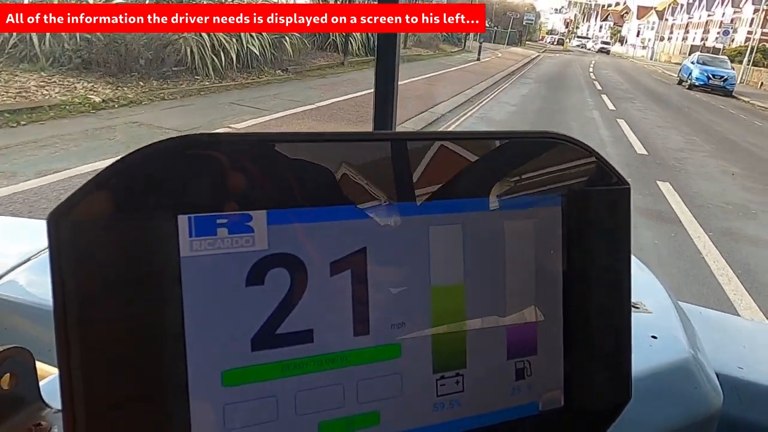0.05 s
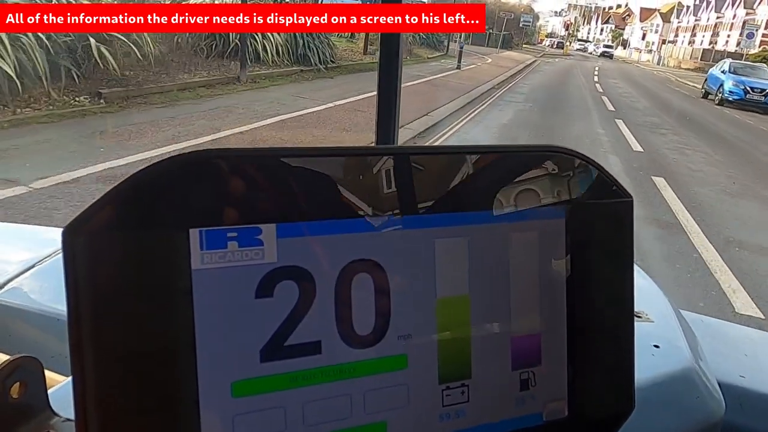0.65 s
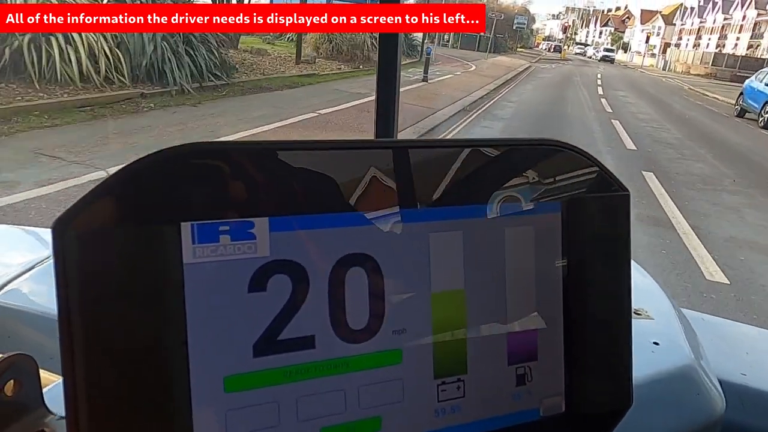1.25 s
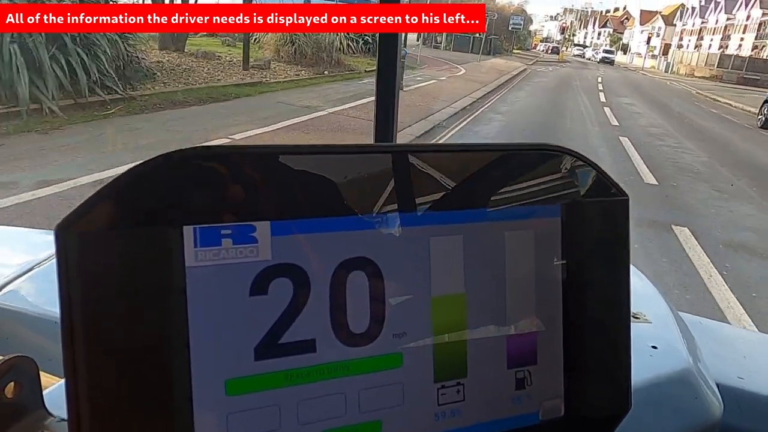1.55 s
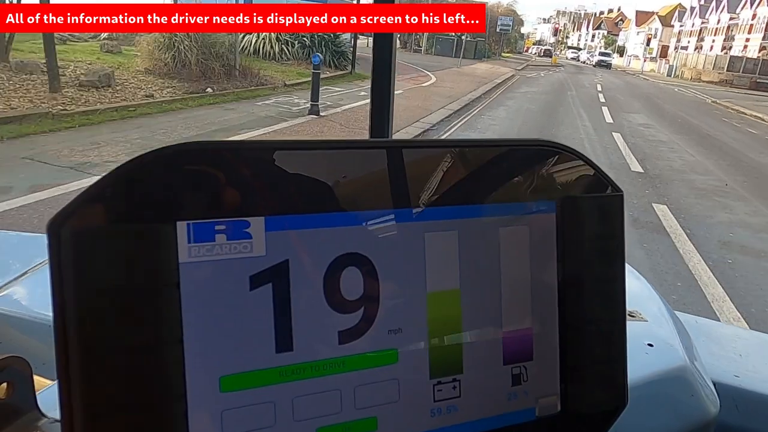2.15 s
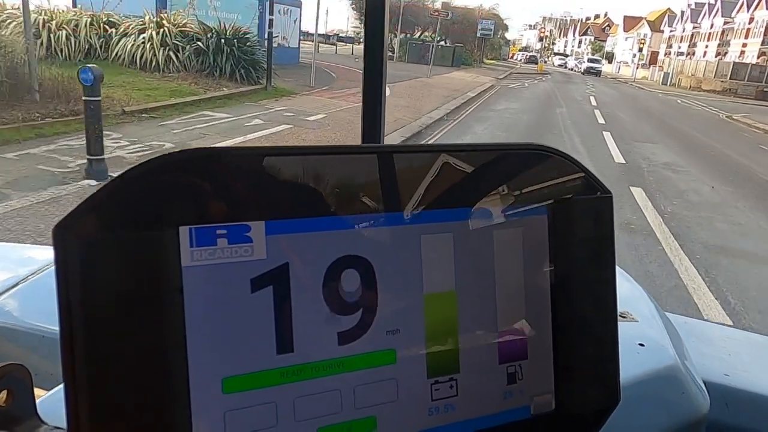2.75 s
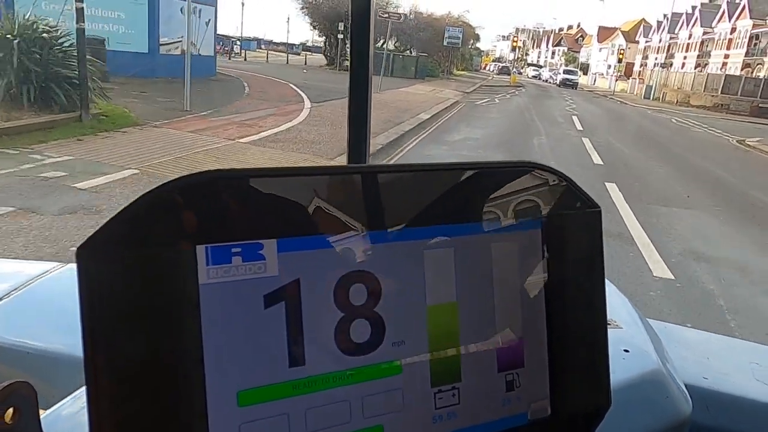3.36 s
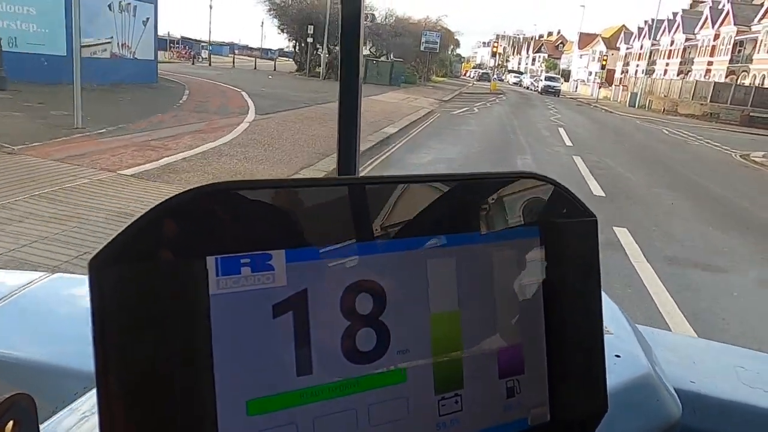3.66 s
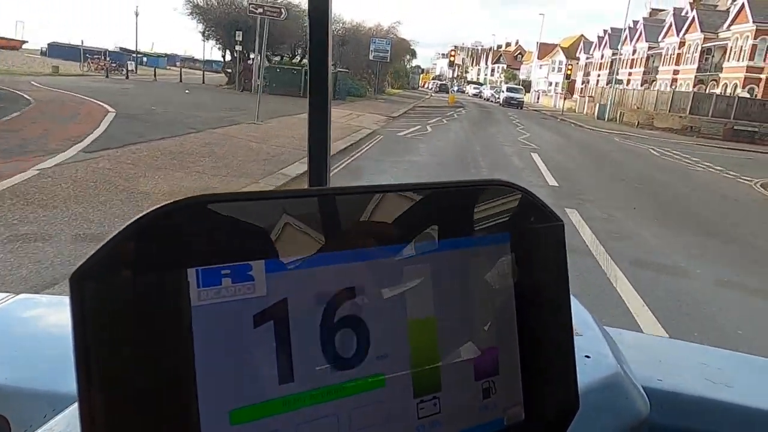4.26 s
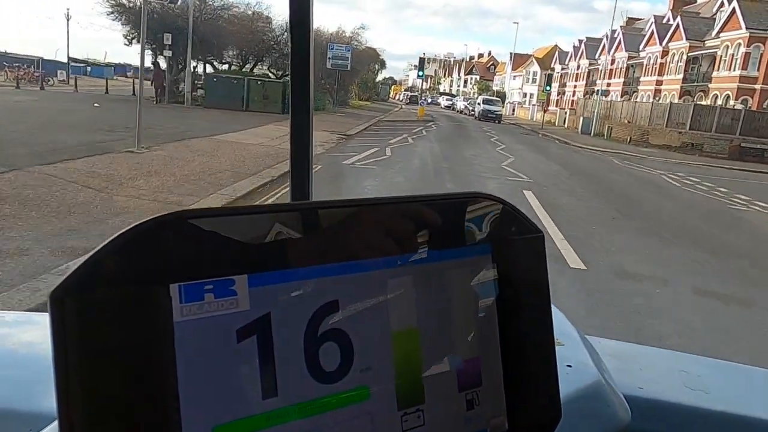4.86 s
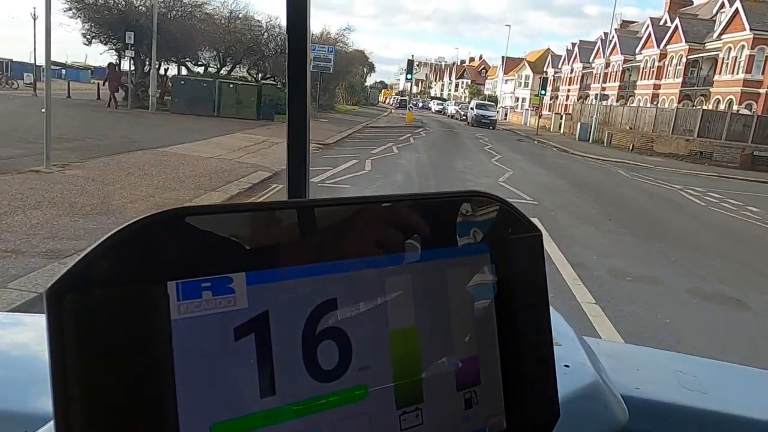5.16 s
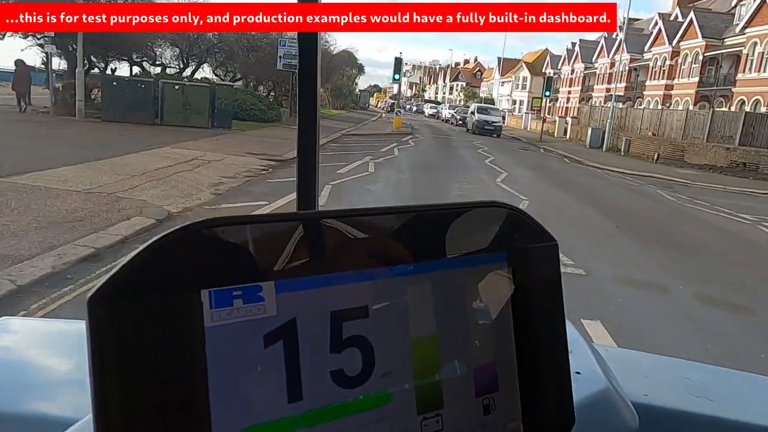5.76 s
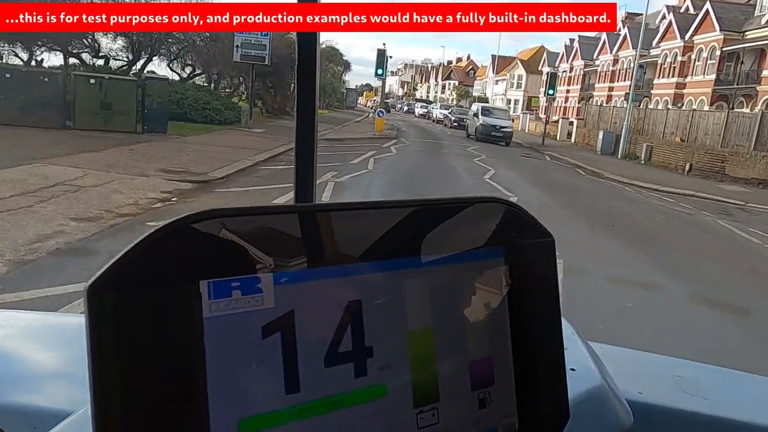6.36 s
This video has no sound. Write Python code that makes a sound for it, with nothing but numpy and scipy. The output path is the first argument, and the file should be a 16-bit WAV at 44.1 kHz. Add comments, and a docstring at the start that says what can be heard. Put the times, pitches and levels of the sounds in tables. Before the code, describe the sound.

Heard in stereo from the driver's seat, an electric bus rolls along a street with a deep, uneven cabin rumble. Bumps set off panel clacks, light rattles, metallic clinks and brief plastic scrapes, mainly on the left, plus one dull dashboard knock. Later the bus slows: a faint gear note sinks while a thin whine, a hum and a soft brake hiss build, ending on a heavier bump.

```python
"""Road rumble inside an electric bus slowing from 19 to 12 miles an hour on a town street,
heard on a stereo microphone at the driver's seat. Rough patches shake the body, floor and walls.
Mostly to the left, bumps make a loose panel clack, fittings rattle and the dashboard knock;
a metal clasp clinks, and plastic trim scrapes and ticks. As the bus slows, a thin drive whine
swells with a low hum and a faint brake hiss, while the gear note sinks."""
import sys
import numpy as np
from scipy import signal
from scipy.fft import rfft, irfft, next_fast_len
from scipy.io import wavfile
from scipy.ndimage import uniform_filter1d, minimum_filter1d, map_coordinates

SR = 44100
rng = np.random.default_rng(int(sys.argv[2]) if len(sys.argv) > 2 else 0)


def wrap_up_sound(samples):
    """Save the sound to the file named by the first command line argument, as 16-bit audio."""
    columns = np.atleast_2d(samples).T
    # keep every value between -1 and 1, then stretch to whole-number steps
    tamed = np.clip(columns, -1, 1)
    steps = np.round(tamed * 32767).astype(np.int16)
    wavfile.write(sys.argv[1], SR, steps)


N = 282681

# the bus slowing: (time [s], speed [mph])
ROAD_SPEED = [(0, 19.2), (2.2, 19.6), (4, 16.6), (4.9, 16.05), (5.65, 15.5), (6.41, 12.3)]
# contact crack of panel and dashboard: (frequency [Hz], level [dB])
CRACK_SPECTRUM = [(300, -21), (700, -4), (1000, -0.5), (1600, -8.5), (2500, 5.5), (3600, -2.5), (5600, -3),
                  (6600, -11.5), (7500, -24.5), (10000, -49.5), (15000, -71.5)]
# loose parts sit left of the microphone: (frequency [Hz], left minus right [dB])
PARTS_BALANCE = [(500, 1.5), (1400, 5), (2400, 5.5), (3800, 5.5), (6000, 0)]


def road():
    """Speed sets the rumble and tyre roar; rough patches swell them, shaking body, floor and walls."""
    # spectra at the seat, each (frequency [Hz], level [dB])
    body_sway = [(7.1, -23), (12, 9), (32, 9), (70, -10), (91, -45), (150, -120)]
    floor_boom = [(32, -39.5), (55, -1.5), (77, -2), (108, -20), (135, -20), (180, -28), (300, -120)]
    cabin_drone = [(71, -36), (120, -2.5), (142, -3.5), (205, -3), (250, -7.5), (285, -7.5), (312, -11),
                   (380, -10), (520, -17.5), (680, -45), (1140, -120)]
    tyre_roar = [(250, -33), (430, -14.5), (500, -7), (700, -5), (815, -9.5), (980, -7.5), (1400, -11.5),
                 (1800, -17), (2150, -15.5), (2800, -24.5), (4100, -26), (6200, -37), (9000, -51),
                 (15500, -76)]
    # rough and smooth road: (middle [s], half length [s], change in sway, boom, drone, tyres [dB])
    patches = [(0, 0.054, 11, -10.5, 1.5, 5.5), (.321, 0.14, 0, 8.5, 4, 2.5), (0.493, 0.077, 0, 5, 1, -1.5),
               (0.718, 0.063, -7.5, -10, 2.5, 1.5), (0.899, 0.082, 1, 5.5, 1, 3),
               (1.09, 0.066, 1.5, 2.5, 1.5, 1), (1.407, .13, -1, 5, 5, 0), (1.577, .1, -0.5, 7, 3.5, 0.5),
               (1.827, 0.14, 0, -4.5, 0.5, -.5), (2.077, 0.14, -5.5, 6, -1.5, -2),
               (2.362, 0.081, -0.5, -7, 1.5, 0), (2.545, 0.059, -1.5, -10, 1, -0.5),
               (2.768, 0.12, -1, 7.5, 2.5, 1), (2.916, 0.12, 0, 4, 3.5, 2), (3.133, .05, 0, -4, 2.5, 0),
               (3.484, 0.17, 2, 2, 1.5, 5), (4.129, 0.09, 3, -0.5, 3, 2.5),
               (4.708, 0.033, 0, -1.5, 3.5, -0.5), (4.857, .06, 2, 6, 4.5, 2),
               (4.977, 0.054, -7, -1.5, 1, 0), (5.6, 0.18, 4, 2, 1, 0.5), (5.884, .12, -6.5, -1.5, 0, -1.5),
               (6.197, 0.13, -3.5, 4, 2, 2), (6.4, 0.071, 3, 12.5, 10, 13)]
    speed, t = speed_db(), np.arange(N) / SR
    swells = sum(np.outer(db, np.exp(-((t - s) / half) ** 2)) for s, half, *db in patches)
    sway_db, boom_db, drone_db, tyre_db = swells

    def shaken(db, colour, uneven_db):
        return amp(db + uneven_db * wobble(14)) * steadied(cabin_noise(colour), span=0.087)

    sway = shaken(-13 + 0.68 * speed + sway_db, shape(body_sway), uneven_db=0.8)
    boom = shaken(-26.5 + 0.37 * speed + boom_db, shape(floor_boom), uneven_db=1)
    drone = shaken(-29 + 0.57 * speed + drone_db, ringing(cabin_drone), uneven_db=1.05)
    tyres = amp(-37.5 + 1.78 * speed + tyre_db + 0.89 * wobble(18)) * cabin_noise(ringing(tyre_roar))
    return sway + boom + drone + tyres


def panel():
    """A loose panel left of the microphone clacks at the bigger bumps."""
    # (time [s], relative level [dB], low knock [dB], brightness [dB], favoured pitch [Hz], slam delay [s])
    clacks = [(.2485, -14, -3, -4, 2550, .014), (.8365, -17, -2.5, -3.5, 2660, .011),
              (1.5105, -18, -9, -5, 2300, 0.0074), (1.920, -24, -13, -12.5, 3060, 0.0085),
              (2.0265, -14.5, -0.5, -3, 2660, .014), (2.6245, -14.5, -3, -2, 2550, .007),
              (2.7645, -13.5, 4.5, -5.5, 2376, .013), (3.2885, -17.5, -2, -3.5, 2230, 0.0083),
              (4.850, -22, -8, -1, 2700, 0.01), (5.623, -20.5, 2, 3, 2500, 0.0051),
              (5.7355, -22.5, -8, 0.5, 2380, 0.0056), (6.350, -12.5, -5.5, -3.5, 2920, 0.0071),
              (6.379, -28, 2.5, 1.5, 2150, 0.0046)]
    # panel resonances: (frequency [Hz], width [Hz], level [dB])
    modes = [(990, 67, -6.5), (1780, 67, -12.5), (2014, 62, -11), (2235, 52, -4), (2493, 56, -4),
             (2586, 38, -7.5), (2709, 29, 0), (2778, 38, -7), (3000, 18, -16), (3235, 17, -7),
             (3424, 67, -10.5), (3590, 44, -6.5), (3836, 49, -5.5), (3976, 40, -13), (4450, 55, -18.5),
             (4740, 32, -13), (5160, 70, -13), (5430, 60, -9.5), (5750, 70, -14.5), (6050, 88, -15),
             (6580, 79, -24.5)]
    return amp(-18) * loose_part(clacks, modes, CRACK_SPECTRUM, hold_s=0.0026, t60=0.18,
                                 crack_db=-4, wet_db=-7.5, spot_db=5)


def fittings():
    """Small fittings rattle at the lesser bumps."""
    # (time [s], relative level [dB], low knock [dB], brightness [dB], favoured pitch [Hz], slam delay [s])
    rattles = [(.660, -32.5, -10, -12, 2210, 0.0025), (1.380, -29.5, -2, -3.5, 4800, 0.0052),
               (1.405, -28.5, 0, 2.5, 2300, .004), (1.473, -33, -2, -3, 2300, 0.0057),
               (1.675, -29, 0.5, -2.5, 2200, .004), (2.855, -37.5, 1, 11, 4600, 0.0049),
               (2.915, -30.5, 2, -1, 2200, 0.0034), (2.928, -24.5, 1, 2.5, 3230, 0.0062),
               (3.004, -35.5, 1, -8, 4700, 0.0026), (3.096, -28.5, 1, -7, 2150, 0.0064),
               (3.114, -32.5, -3.5, 8, 3420, .004), (3.420, -31, 5.5, -11, 2200, 0.0045),
               (3.509, -27.5, -2, -0.5, 3340, 0.0032), (4.185, -28, -4.5, -4.5, 2200, 0.0026),
               (4.283, -33.5, -4, -4, 2256, .004), (4.308, -35, 0.5, -1.5, 3000, 0.0025),
               (4.394, -36, 5.5, 1, 2300, .004), (5.583, -25.5, -3, 0.5, 1980, 0.0072),
               (6.063, -28.5, -6, 2.5, 2950, 0.0088)]
    # their resonances: (frequency [Hz], width [Hz], level [dB])
    modes = [(1850, 270, -4.5), (2170, 180, -3), (2700, 100, -3), (2900, 21, 4), (3390, 22, -2),
             (3880, 37, -6.5), (4320, 120, -5), (4760, 80, -8), (5590, 80, -8.5), (5250, 70, -7.5),
             (6160, 38, -16.5)]
    # their contact crack: (frequency [Hz], level [dB])
    crack_spectrum = [(400, -20.5), (1000, 5), (2200, 2), (3200, -0.5), (5000, -4), (6200, -9.5),
                      (7000, -20), (10000, -42.5), (15000, -56.5)]
    return amp(-17.5) * loose_part(rattles, modes, crack_spectrum, hold_s=0.012, t60=0.15,
                                   crack_db=-2.5, wet_db=-6.5, spot_db=8)


def dashboard():
    """A bump shakes one dull knock out of the dashboard."""
    # (time [s], relative level [dB], low knock [dB], brightness [dB], favoured pitch [Hz], slam delay [s])
    knocks = [(4.089, -24, 5.5, -8, 1790, 0.002)]
    # dashboard resonances: (frequency [Hz], width [Hz], level [dB])
    modes = [(1070, 50, -2), (1380, 110, 3), (1660, 120, -0.5), (2170, 89, -1.5), (2430, 45, -11),
             (3270, 60, -19)]
    return amp(-18) * loose_part(knocks, modes, CRACK_SPECTRUM, hold_s=0.004, t60=0.15,
                                 crack_db=-6, wet_db=-15.5, spot_db=3.5)


def loose_part(events, modes, crack_spectrum, hold_s, t60, crack_db, wet_db, spot_db):
    """A part touches its seat, slams home, bounces and buzzes, ringing its modes and the cabin."""
    lead_s, touch_db, rise_s = 0.012, -2.5, 0.0008
    bounce_s, hard_db, hard_s = 0.0099, 4.5, 0.00077
    spot_octaves, detune = 0.17, 0.005
    out, t = np.zeros((2, N + SR)), np.arange(SR // 4) / SR - lead_s
    for s, db, knock_db, bright_db, spot_hz, slam in events:
        closing_db = touch_db * np.clip(1 - t / slam, 0, 1) - 60 * np.maximum(t - slam - hold_s, 0) / t60
        bounces = slam + np.cumsum(bounce_s * (0.5 + rng.random(6)))
        hard_hits = sum((t >= at) * np.exp(-np.abs(t - at) / hard_s) for at in [slam, *bounces])
        pressure = (1 + np.tanh(t / rise_s)) / 2 * amp(closing_db) * (1 + amp(hard_db) * hard_hits)
        contacts = pressure * rng.standard_normal(len(t)) * amp(1.4 * rng.standard_normal(len(t)))
        # each blow lands on a new spot, favours other modes and shifts them a little
        favour = lambda hz: spot_db * np.exp(-(np.log2(hz / spot_hz) / spot_octaves) ** 2)
        struck = [(hz * (1 + detune * rng.standard_normal()), width,
                   level + favour(hz) + 2 * rng.standard_normal()) for hz, width, level in modes]
        crack = unit(filtered(pressure * rng.standard_normal(len(t)), shape(crack_spectrum)))
        colour = shape([(1200, knock_db), (2200, 0), (3000, 0), (5000, bright_db)])
        hit = filtered(rung(contacts, struck) + amp(crack_db) * crack, colour)
        start = round((s - lead_s) * SR)
        out[:, start:start + len(t)] += amp(db) * unit(in_cabin(hit, wet_db))
    return leaning(out[:, :N], PARTS_BALANCE)


def rung(contacts, modes):
    """Contacts ring each (Hz, width, dB) mode; its level sets its share of the energy."""
    spectrum, hz = rfft(contacts), np.fft.rfftfreq(len(contacts), 1 / SR)
    centre, width, db = np.transpose(modes)[:, :, None]
    bands = spectrum * 1j * hz * width / (centre ** 2 - hz ** 2 + 1j * hz * width)
    gain = amp(db) * np.sqrt(np.abs(width)) / np.linalg.norm(bands, axis=1, keepdims=True)
    signs = (-1) ** np.arange(len(modes))[:, None]
    return unit(irfft(np.sum(signs * gain * bands, axis=0) * softened(hz), len(contacts)))


def clasp():
    """The tongue and catch of a metal clasp meet softly and ping over a brief, bright chafe."""
    # (time [s], tongue [dB], catch [dB], chafe [dB], sharpening as it seats [%])
    clinks = [(0.051, -49.5, -49, -38.5, 2.5), (1.024, -58, -61, -43, 0.64),
              (1.037, -34.5, -53, -35.5, -0.052), (1.1067, -42, -33, -42, -0.3),
              (3.467, -44, -32.5, -40, 2), (4.721, -62.5, -45, -48, 0.5), (4.811, -44, -38, -34, -1.5)]
    # modes of the two pieces, each (frequency [Hz], level [dB], t60 [s])
    tongue_modes = [(2150, 0, .34), (2627, -8, .2), (3490, -12, .25), (3940, -13, .22), (4370, -2, .2),
                    (5017, -12, .15), (5534, -4, .16), (7690, -26, .12), (8650, -28, .1), (11500, -43, .08)]
    catch_modes = [(2411, 0, .11), (3560, -5, .17), (4730, -6, .12), (5580, -18, .16), (5996, -20, .12),
                   (8000, -31, .12), (13000, -50, .06)]
    # metal chafing: (frequency [Hz], level [dB])
    chafe_spectrum = [(700, -19), (2500, 3.5), (5500, -4), (6800, -14.5), (8700, -22), (10500, -36),
                      (14000, -40.5), (15500, -55)]
    rise_s, chafe_t60 = 0.0044, 0.2
    out, t = np.zeros((2, N + SR)), np.arange(SR // 4) / SR
    rise = np.sin(np.pi / 2 * np.minimum(t / rise_s, 1)) ** 2
    for s, tongue_db, catch_db, chafe_db, sharp in clinks:
        pitch = 1 + sharp / 100
        noise = unit(filtered(rng.standard_normal(len(t)), shape(chafe_spectrum)))
        chafe = amp(chafe_db - 60 * t / chafe_t60) * noise
        tongue = amp(tongue_db) * ping(tongue_modes, pitch, t)
        catch = amp(catch_db) * ping(catch_modes, pitch, t)
        start = round(s * SR)
        out[:, start:start + len(t)] += in_cabin(rise * (tongue + catch + chafe), wet_db=-4)
    return leaning(out[:, :N], PARTS_BALANCE)


def ping(modes, pitch, t, blur_hz=30, chatter_db=4, chatter_s=0.006):
    """Struck metal; chafing blurs each mode and makes it chatter."""
    out, span = np.zeros(len(t)), int(chatter_s * SR)
    for hz, db, t60 in modes:
        chatter = unit(uniform_filter1d(uniform_filter1d(rng.standard_normal(len(t)), span), span))
        walk = uniform_filter1d(np.cumsum(rng.standard_normal(len(t))), size=64)
        phase = 2 * np.pi * hz * pitch * t + walk * np.sqrt(2 * np.pi * blur_hz / SR)
        out += amp(db - 60 * t / t60 + chatter_db * chatter) * np.sin(phase)
    return out


def trim_scrape():
    """Plastic trim groans and slides in tiny gritty slips as the body twists."""
    # slides: (time [s], level [dB], hold [s])
    slides = [(1.7, -44, .06), (3.512, -31, .012), (3.585, -34, .02), (3.655, -42.5, .012),
              (5.565, -45, .029)]
    # trim resonances: (frequency [Hz], width [Hz], level [dB])
    modes = [(1700, 273, 3.5), (2020, 430, -1), (2400, 200, -4.5), (4570, 540, -16.5), (6500, 1500, -34)]
    # hiss of the slips: (frequency [Hz], level [dB])
    grit_spectrum = [(3000, -20), (4700, 6.5), (6000, -5), (8000, -19.5), (10000, -27), (13000, -35.5),
                     (15500, -57)]
    attack_s, t60 = 0.031, 0.33
    strokes, t = np.zeros(N), np.arange(N) / SR
    for s, db, hold in slides:
        grip = np.clip((t - s) / attack_s, 0, 1)
        strokes += grip * amp(db - 60 * np.maximum(t - s - attack_s - hold, 0) / t60)
    pressing = amp(1.5 * wobble(30))
    slips = amp(1.1 * wobble(150))
    rub = cabin_noise(lambda hz: resonances(modes, hz) * softened(hz))
    grit = amp(-19) * unit(amp(3 * wobble(400)) * cabin_noise(shape(grit_spectrum)))
    groan = amp(-10) * tone(hz=702, waver_hz=2.9, flutter_db=0.5)
    return strokes * pressing * (unit(slips * rub) + grit + groan)


def trim_ticks():
    """The trim settles with small bright ticks, left of the microphone."""
    # (time [s], level [dB], t60 [s])
    ticks = [(.605, -52, 0.066), (0.727, -54, .12), (.838, -45.5, .09), (2.875, -50.5, .06),
             (3.007, -48, .07), (3.764, -37.5, 0.017), (4.036, -51, 0.14), (5.59, -47, .11),
             (6.365, -44.5, .12)]
    # colour of a tick: (frequency [Hz], level [dB])
    spectrum = [(1500, -14), (3000, -2), (5700, 0.5), (6600, -9), (7700, -5), (10000, -27.5),
                (15000, -44.5)]
    t, rise_s = np.arange(N) / SR, 0.0008
    snaps = sum(np.clip((t - s) / rise_s, 0, 1) * amp(db - 60 * np.abs(t - s) / t60)
                for s, db, t60 in ticks)
    return panned(snaps * cabin_noise(shape(spectrum)), left_db=6.5)


def drive_and_brakes():
    """Slowing loads the drive: it whines and hums and the brakes hiss, all growing with the effort."""
    # (time [s], braking effort [dB])
    braking = [(0, -55.5), (3.9, -36.5), (4.5, -16.5), (5.0, -17), (5.4, -9.5), (5.9, -7), (6.1, -2.5),
               (6.41, 1.5)]
    # the whine's fundamental: (time [s], pitch [Hz])
    whine_pitch = [(4.9, 1272), (5.65, 1265), (6.33, 1272)]
    # its harmonics: (multiple, level [dB])
    harmonics = [(1, -4), (2, -22), (3, -24.5)]
    # weaker tones around them: (frequency [Hz], level [dB])
    side_tones = [(1626, -14.5), (1723, -15), (2094, -14.5), (2315, -20.5), (2525, -21.5), (2907, -21.5),
                  (3801, -23.5), (3973, -26.5), (4958, -22.5), (5997, -24)]
    # brake hiss: (frequency [Hz], level [dB])
    hiss_spectrum = [(700, -15), (1300, 2), (2200, -2.5), (2800, -4.5), (3300, -11), (3900, -10.5),
                     (4300, -6), (4700, -10), (5400, -10), (5800, -19), (6100, -6), (6350, -12),
                     (6600, -19.5), (8000, -36.5), (12000, -68)]
    hum_hz, sag_hz = 429.5, 6  # effort pulls the hum's pitch down
    effort_db, pitch = curve(braking), curve(whine_pitch)
    whine = sum(amp(db) * tone(k * pitch, waver_hz=1.2, flutter_db=1.5) for k, db in harmonics)
    sides = sum(amp(db) * tone(hz, waver_hz=6.5, flutter_db=2.5) for hz, db in side_tones)
    hum = tone(hum_hz + sag_hz * (1 - amp(effort_db)), waver_hz=5, flutter_db=1.5)
    motor = amp(-37.5 + 0.89 * effort_db) * (whine + sides) + amp(-36 + 1.4 * effort_db) * hum
    hiss = amp(-41 + 0.68 * effort_db) * cabin_noise(shape(hiss_spectrum))
    return panned(motor, left_db=6) + hiss


def gears():
    """The gear mesh sinks with road speed and sings out as it passes each resonance of its casing."""
    # (frequency [Hz], width [Hz], level [dB])
    casing_modes = [(366, 46, -43), (338, 10, -38.5)]
    hz_per_mph = 21.72
    pitch = hz_per_mph * curve(ROAD_SPEED)
    gain = sum(amp(db) / (1 + (2 * (pitch - hz) / width) ** 2) for hz, width, db in casing_modes)
    return gain * tone(pitch, waver_hz=3.9, flutter_db=0)


def tread():
    """The rolling tyres ring faintly on one wavering note that fades as the bus slows."""
    note = tone(hz=979, waver_hz=7, flutter_db=2.5)
    return panned(amp(-51.5 + 3.7 * speed_db()) * note, left_db=3)


def cabin_noise(colour):
    """Stereo noise of rms 1: one pressure in the bass, diffuse and stronger on the left above it."""
    # (frequency [Hz], left-right likeness [0 to 1])
    likeness = [(40, 1), (150, 1), (300, 0.99), (600, 0.92), (1200, 0.85), (3000, 0.78), (6000, 0.41),
                (12000, 0.48)]
    # (frequency [Hz], left minus right [dB])
    balance = [(40, -0.1), (100, -0.4), (200, 0.2), (400, 0.5), (700, 3.5), (1400, 2.5), (3000, 3),
               (5000, 1)]

    def spread(hz):
        angle = np.arccos(np.clip(along(likeness, hz), -1, 0.9995)) / 2
        return colour(hz) * np.array([np.cos(angle), np.sin(angle)])

    mid, side = filtered(rng.standard_normal((2, N)), spread)
    return unit(leaning(np.array([mid + side, mid - side]), balance))


def ringing(points):
    """A (Hz, dB) spectrum coloured by narrow resonances of the cabin air and windows."""
    # (frequency [Hz], width [Hz], boost [dB])
    modes = [(150.4, 18, 4), (222.7, 18, 2), (285.8, 6.3, 5.5), (338, 2.4, 3), (403, 13, 1.5),
             (486, 5.2, 3.5), (557, 16, 3), (700, 8.3, -3.5), (768, 3.9, 0.5), (970, 10, 1.5),
             (1167, 5.3, 4), (1386, 22, 5)]
    boost_db = lambda hz: sum(db / (1 + (2 * (hz - c) / w) ** 2) for c, w, db in modes)
    return lambda hz: amp(along(points, hz) + boost_db(hz))


def in_cabin(hit, wet_db):
    """A short sound with its own diffuse cabin echo in each channel."""
    # (frequency [Hz], t60 [s])
    decay = [(300, 0.33), (2500, 0.32), (6000, 0.28), (12000, 0.32)]
    size = len(hit)
    hz, t, noise = signal.stft(rng.standard_normal((2, size)), SR, nperseg=256)
    tail = signal.istft(noise * amp(-60 * t / along(decay, hz)[:, None]), SR, nperseg=256)[1][:, :size]
    tail /= np.linalg.norm(tail[0])
    return hit + amp(wet_db) * signal.fftconvolve(hit[None], tail, axes=1)[:, :size]


def speed_db(cruise_mph=18):
    """Road speed in dB against cruising speed."""
    return 20 * np.log10(curve(ROAD_SPEED) / cruise_mph)


def softened(hz, corner_hz=7000):
    """The treble falls away steeply above the corner frequency."""
    return 1 / np.sqrt(1 + (hz / corner_hz) ** 6)


def resonances(modes, hz):
    """Causal response of (Hz, width, dB) modes."""
    return sum((-1) ** k * amp(db) * 1j * hz * w / (c * c - hz * hz + 1j * hz * w)
               for k, (c, w, db) in enumerate(modes))


def tone(hz, waver_hz, flutter_db):
    """A slightly unsteady sine of rms 1."""
    phase = 2 * np.pi * np.cumsum(hz + waver_hz * wobble(25)) / SR
    return unit(np.sin(phase) * amp(flutter_db * wobble(12)))


def steadied(x, span):
    """Noise with its chance swells slower than span seconds evened out."""
    power = uniform_filter1d(np.mean(x ** 2, axis=0), int(span * SR))
    return unit(x / np.sqrt(np.abs(power) + 0.054))


def wobble(rate):
    """A smooth random curve, rate knots a second."""
    return map_coordinates(rng.standard_normal(int(N * rate / SR) + 4), [np.arange(N) * rate / SR])


def panned(x, left_db):
    """Louder on the left by left_db."""
    return x * amp(np.array([[left_db], [-left_db]]) / 2)


def leaning(x, points):
    """Louder on the left by a (Hz, dB) spectrum."""
    return filtered(x, lambda hz: amp(np.outer([0.5, -0.5], along(points, hz))))


def filtered(x, response):
    """x through a complex frequency response."""
    size = x.shape[-1]
    padded = next_fast_len(size + 8192)
    return irfft(rfft(x, padded) * response(np.fft.rfftfreq(padded, 1 / SR)), padded)[..., :size]


def shape(points):
    """The gain of a (Hz, dB) spectrum as a function of frequency."""
    return lambda hz: amp(along(points, hz))


def along(points, hz):
    """(Hz, value) points joined on a log axis."""
    knots, values = np.transpose(points)
    return np.interp(np.log(hz + 1), np.log(knots + 1), values)


def curve(points):
    """(time, value) points joined into one value per sample."""
    return np.interp(np.arange(N) / SR, *np.transpose(points))


def amp(db):
    """Decibels to gain."""
    return 10 ** (np.asarray(db) / 20)


def unit(x):
    """Scaled to rms 1."""
    return x / np.sqrt(np.mean(x ** 2) + 1e-20)


def scene():
    """Everything heard from the driver's seat."""
    rolling = road() + tread() + gears()
    rattling = panel() + fittings() + dashboard() + clasp()
    return rolling + rattling + trim_scrape() + trim_ticks() + drive_and_brakes()


def record(dry):
    """The microphone's two ports differ in phase; a limiter eases peaks and the top treble is cut."""
    # (frequency [Hz], lead of the left port [rad])
    port_phase = [(30, 0.16), (70, 0.019), (180, 0.14), (450, -0.092), (1000, -.2), (2500, -0.77),
                  (4700, -0.69), (6500, -1.6)]
    ceiling, limiter_s, top_hz = 0.88, 0.03, 15700
    ports = filtered(dry, lambda hz: np.exp(1j * np.outer([0.5, -0.5], along(port_phase, hz))))
    needed_gain = ceiling / np.maximum(np.abs(ports).max(axis=0), ceiling)
    span = int(limiter_s * SR)
    gain = uniform_filter1d(minimum_filter1d(needed_gain, span), span)
    return filtered(ports * gain, lambda hz: hz < top_hz)


dry = scene()
out = record(dry)
wrap_up_sound(out)
```